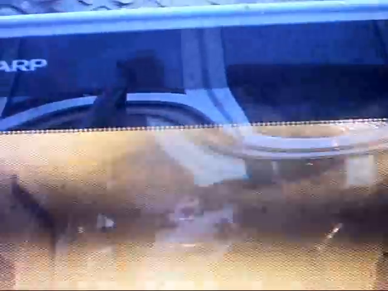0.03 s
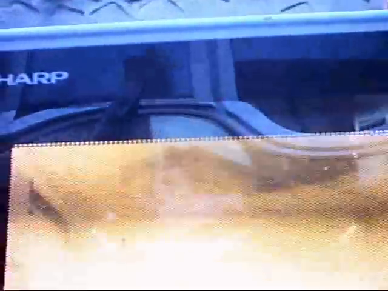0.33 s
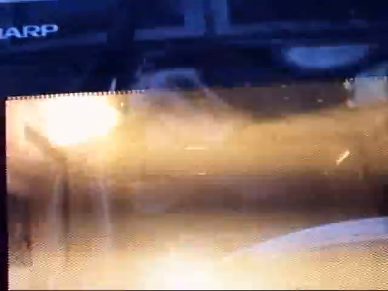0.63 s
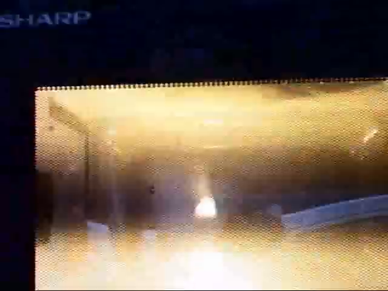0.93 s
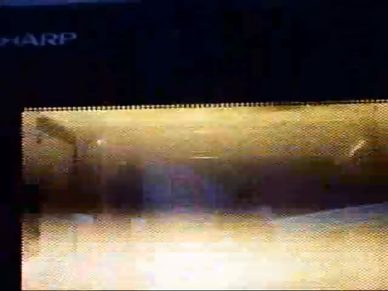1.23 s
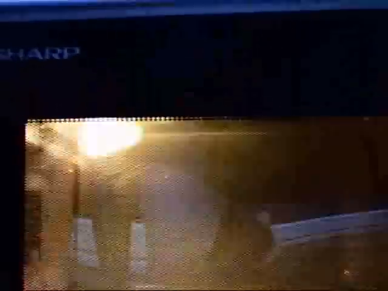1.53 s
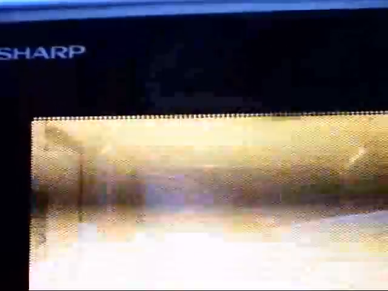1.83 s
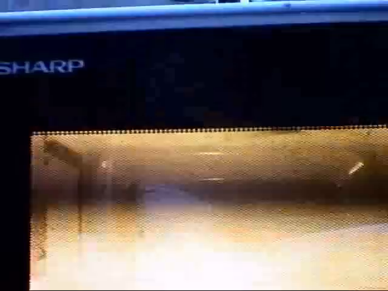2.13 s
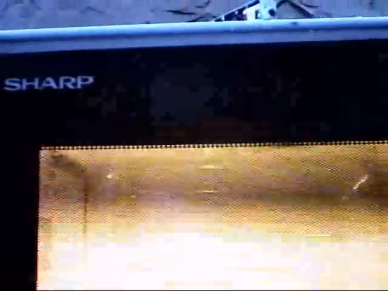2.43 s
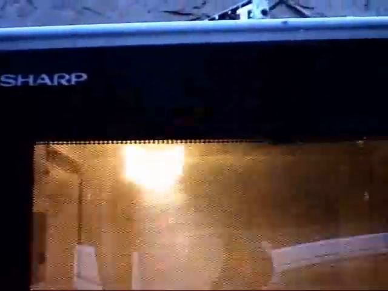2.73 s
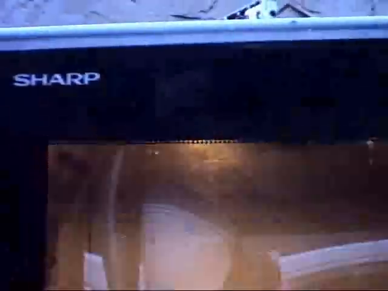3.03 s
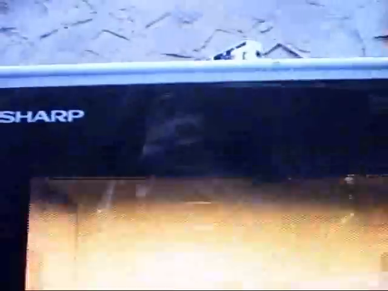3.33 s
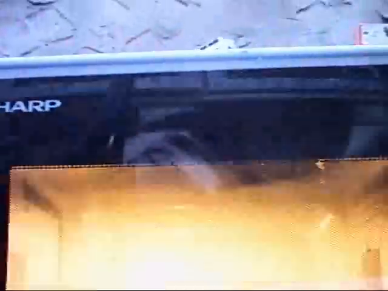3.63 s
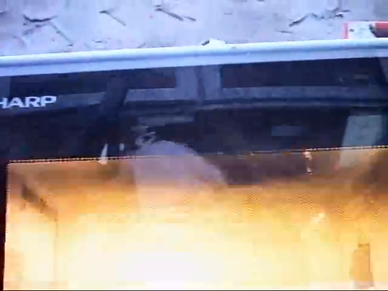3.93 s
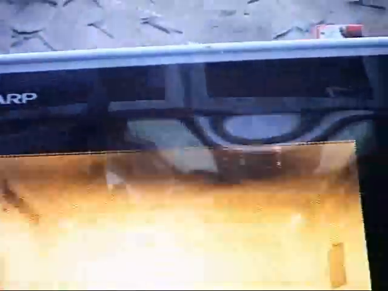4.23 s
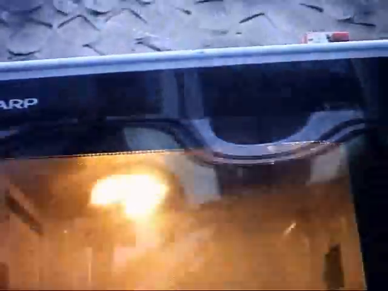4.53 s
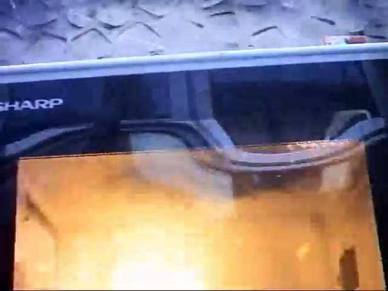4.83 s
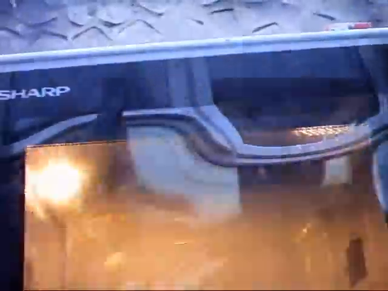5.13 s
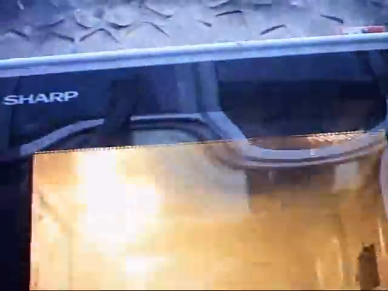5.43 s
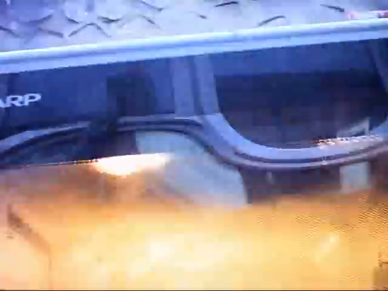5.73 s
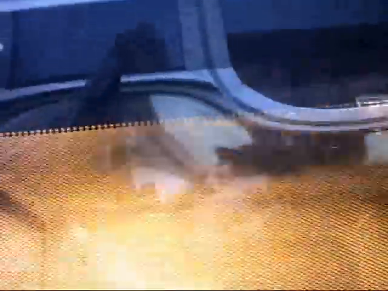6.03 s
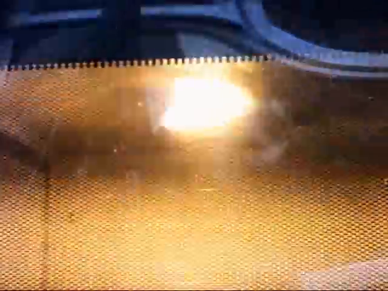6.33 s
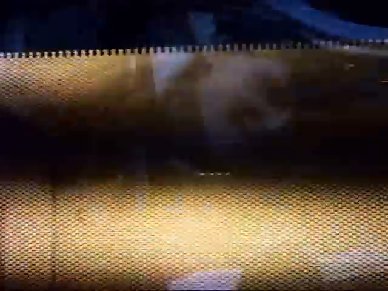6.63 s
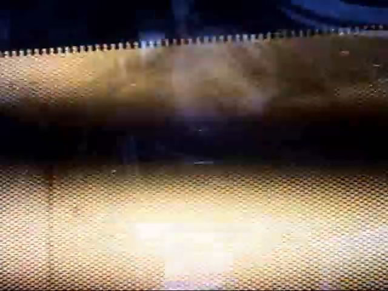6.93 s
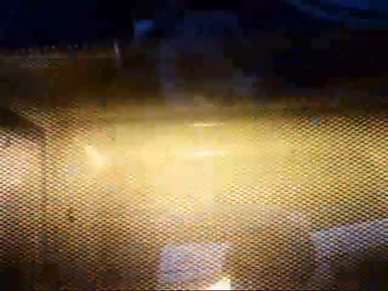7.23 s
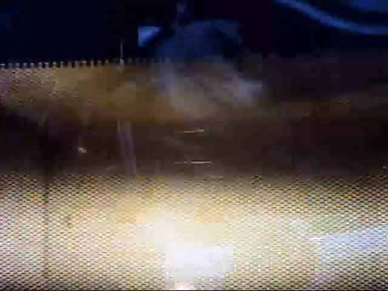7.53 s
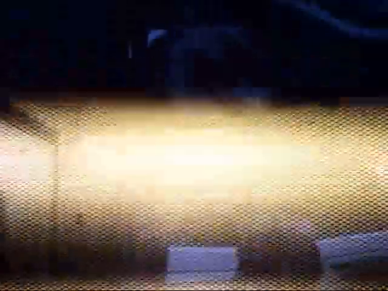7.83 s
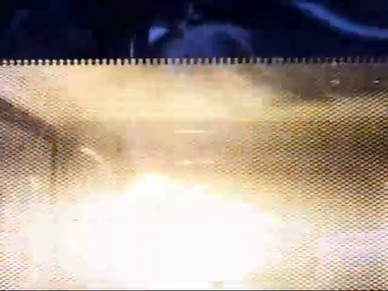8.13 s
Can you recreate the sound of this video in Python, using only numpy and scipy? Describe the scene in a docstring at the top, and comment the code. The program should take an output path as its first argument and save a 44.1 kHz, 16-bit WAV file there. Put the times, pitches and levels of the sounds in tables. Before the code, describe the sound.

Electrical arcing crackles and buzzes inside a running microwave, heard from just outside its door. The transformer hums and the fan rushes throughout, with a thin high whine above them. Spells of sizzling and sharp snaps come first, then short roaring flares with hollow booms and dull thumps. The hum and fan grow stronger as dense sizzling resumes, ending in a loud double flare. The sound is gritty and lo-fi.

```python
"""Sparks in a microwave oven

A microwave oven runs close by while something arcs inside it. The transformer hums and the fan roars;
sparks sizzle once per mains cycle, snap, and flare into plasma that rings the steel cavity.
Narrow tones swell around flares and the casing thumps. A cheap camera holds each sample at about 8 kHz,
which mirrors the hum into a thin whine and the sparks into a gritty treble."""
import sys
import numpy as np
from scipy import signal
from scipy.fft import rfft, irfft
from scipy.io import wavfile

SR = 44100
rng = np.random.default_rng(int(sys.argv[2]) if len(sys.argv) > 2 else 0)


def wav_out(sig):
    """Save sig, one row per channel (or a flat mono array), as 16-bit PCM at SR to the path in sys.argv[1]."""
    wavfile.write(sys.argv[1], SR, np.round(np.clip(np.atleast_2d(sig).T, -1, 1) * 32767).astype(np.int16))


N = 360738
TIME = np.arange(N) / SR
FILTER_HZ = np.fft.rfftfreq(8192, 1 / SR)
MAINS_HZ = 50.13

# how strongly the casing and fan carry to the moving microphone: time_s, level_db
CASING_CARRY = [(0.0, -32.5), (1.1, -34), (2.4, -33.5), (3.6, -37.5), (4.7, -41.5), (5.4, -39.5),
                (5.95, -28), (7.0, -27), (8.1, -28.5)]
# resonances of the steel cavity and door: pitch_hz, width_hz, level_db
CAVITY_MODES = [(472, 74, -7), (710, 152, -2), (1064, 95, 4.5), (1220, 114, -4), (1252, 79, 4),
                (1460, 90, -5), (1550, 68, 2), (1740, 52, -1.5), (2100, 145, -2.5), (2297, 35, 2),
                (2620, 73, 0.5), (2660, 67, -1), (2996, 280, -1), (3375, 150, 3.5), (3627, 130, 2),
                (3680, 370, 0.5)]
# plasma flares: start_s, length_s, level_db, relative_boom_db, opening_snap_db
PLASMA_FLARES = [(0.301, .04, -22.5, -7, -22), (0.381, 0.01, -23.5, -4, -20), (1.28, 0.089, -25, -7, -9),
                 (1.757, 0.026, -32.5, 0.5, -7), (2.398, .16, -22, -6, -17), (4.033, 0.052, -29, -23, -35),
                 (4.272, 0.041, -27, -6, -20), (4.432, 0.063, -29.5, -19, -9),
                 (4.73, 0.0058, -27.5, -2, -16), (4.769, 0.0076, -30.5, -11, -28),
                 (5.188, 0.032, -26, -3.5, -7.5), (5.311, 0.031, -26.5, -17, -12),
                 (5.907, 0.0071, -22, 6, -6), (6.024, 0.025, -26, -6, -10.5), (8.0, 0.014, -25, 2, -3.5),
                 (8.021, 0.013, -21, -3, -4)]


def amp(db):
    """Decibels to gain."""
    return 10 ** (np.asarray(db) / 20)


def unit(x):
    """Scales to rms 1."""
    return x / np.sqrt(np.mean(x ** 2) + 1e-20)


def curve(rows):
    """Rows of time_s, value drawn out to every sample."""
    return np.interp(TIME, *np.transpose(rows))


def swing(rows):
    """A level curve in dB about its own mean."""
    return curve(rows) - curve(rows).mean()


def spectrum(points, hz):
    """Gain of an EQ curve of frequency_hz, level_db on a log-frequency axis."""
    points_hz, db = np.transpose(points)
    return amp(np.interp(np.log(hz + 1), np.log(points_hz), db))


def resonances(modes):
    """Gain of overlapping resonances with steep skirts; losses keep each at least 4% wide."""
    power = 0
    for hz, width_hz, db in modes:
        detuning = (FILTER_HZ - hz) / (.8 * max(width_hz, hz / 25))
        power += amp(db) ** 2 / (1 + detuning ** 2) ** 2
    return np.sqrt(power)


def noise(points):
    """Noise of rms 1 through an EQ curve."""
    gain = spectrum(points, np.fft.rfftfreq(N, 1 / SR))
    return unit(irfft(rfft(rng.standard_normal(N)) * gain, N))


def drift(rate_hz):
    """A smooth random wander of rms 1."""
    hz = np.fft.rfftfreq(N, 1 / SR)
    return unit(irfft(rfft(rng.standard_normal(N)) * np.exp(-(hz / rate_hz) ** 2), N))


def add(mix, start_s, sound):
    """Mixes a sound in at its start time."""
    part = mix[max(round(start_s * SR), 0):][:len(sound)]
    part += sound[:len(part)]


def transformer(trim_db=-0.54, usual_db=-19, unrest_db=0.1):
    """Mains hum: each wavering harmonic follows the load and the casing by its own share."""
    # the load sinks while sparks last and builds before a flare: time_s, level_db
    load = [(0.0, -18.5), (0.23, -16), (0.95, -20), (1.34, -13.5), (1.55, -22.5), (1.78, -18), (2.2, -21.5),
            (2.52, -15), (2.94, -22), (3.33, -20.5), (4.18, -16), (5.75, -19.5), (5.95, -16), (6.29, -20.5),
            (6.45, -30.5), (6.58, -19), (7.81, -23), (8.02, -15.5)]
    # hum partials: mains_multiple, level_db, load_share, casing_share
    harmonics = [(1, -25.5, 1, 0), (2, -16, 0.5, 0.68), (3, -16.5, -1.1, 0.51), (4, -0.5, 1, 0.017),
                 (5, -21.5, 0.4, 0.17), (6, -58, 6.5, 0), (10, -37, 1.5, 0), (13, -34, 1.5, 0)]
    load_db = curve(load) - usual_db + unrest_db * drift(5)
    casing_db, hum = swing(CASING_CARRY), np.zeros(N)
    for multiple, db, load_share, casing_share in harmonics:
        waver_db = abs(1 - load_share) * drift(0.97)
        gain = amp(usual_db + db + load_share * load_db + casing_share * casing_db + waver_db)
        hum += gain * np.sin(2 * np.pi * (multiple * MAINS_HZ * TIME + rng.random()))
    return np.sqrt(2) * amp(trim_db) * hum


def fan(blade_hz=173.6, wander_hz=0.296, tone_db=-26, rumble_db=-27, air_db=-40):
    """A slightly wandering blade tone over the rush of air, which rumbles in the casing."""
    # blade tone partials: multiple, level_db
    blades = [(1, -1.5), (2, -33), (3, -29.5), (4, -29)]
    # casing rumble: frequency_hz, level_db
    rumble_eq = [(20, -26), (45, -17), (80, -15.5), (125, -3), (160, 1.5), (205, 2), (240, -11),
                 (290, -21.5), (450, -32), (900, -76)]
    # rush of air: frequency_hz, level_db
    air_eq = [(100, -27), (330, 2), (420, -1.5), (540, 3.5), (720, 4.5), (880, -2.5), (1200, 1),
              (1900, -5.5), (2600, -9.5), (3500, -17), (4000, -10.5)]
    casing_db = swing(CASING_CARRY)
    turns = np.cumsum(blade_hz + wander_hz * drift(1.7)) / SR
    tone = sum(amp(db) * np.sin(2 * np.pi * (k * turns + rng.random())) for k, db in blades)
    tone *= amp(tone_db + 0.62 * casing_db + drift(2.5))
    rumble = noise(rumble_eq) * amp(rumble_db + 0.46 * casing_db + drift(3))
    return np.sqrt(2) * tone + rumble + amp(air_db) * noise(air_eq)


def arc_envelope(start_s, length_s, attack_s, sag_db_per_s, release_db_per_s):
    """Gain of one arc: it strikes, sags while it burns, then dies away."""
    t, envelope = TIME[:round((length_s + .3) * SR)], np.zeros(N)
    fall_db = sag_db_per_s * t + release_db_per_s * np.maximum(t - length_s, 0)
    add(envelope, start_s, np.minimum(t / attack_s, 1) * amp(-fall_db))
    return envelope


def discharges(per_s, spread_db, cycle_db, strike, burn, back_db, glow_db):
    """Tiny discharges crowd into the part of each mains cycle where the magnetron fires."""
    turns = TIME * MAINS_HZ - strike + .025 * drift(30)  # strike and burn are fractions of a cycle
    cycle, phase = np.floor(turns).astype(int), turns % 1
    strength = amp(cycle_db * np.clip(rng.standard_normal(cycle.max() + 2), -2, 1.4))[cycle]
    back_stroke = amp(back_db) * np.exp(-((phase + .5) % 1) / burn)  # half a cycle later
    gate = strength * (np.exp(-phase / burn) + back_stroke) + amp(glow_db)
    sizes = amp(spread_db * np.clip(rng.standard_normal(N), -2, 2)) * rng.choice([-1, 1], N)
    fires = rng.random(N) < per_s / SR
    return unit(gate * sizes * fires)


def kicks():
    """One pressure kick as the magnetron fires in each mains cycle."""
    return unit(np.diff(np.floor(TIME * MAINS_HZ - .18), prepend=-1))


def oven(drive, gain, echo_db, t60_s):
    """Colours a drive and adds its reflections between the steel walls, at unit power gain."""
    log_gain = np.log(np.maximum(gain / gain.max(), 1e-3))
    mirrored = np.concatenate([log_gain, log_gain[-2:0:-1]])
    minimum_phase = np.exp(signal.hilbert(mirrored).conj())  # no ringing ahead of a hit
    colour = np.fft.ifft(minimum_phase).real[:len(FILTER_HZ)]
    t = np.arange(SR // 3) / SR
    walls = rng.standard_normal(len(t)) * amp(-60 * t / t60_s)
    walls *= amp(echo_db) / np.linalg.norm(walls)
    walls[0] = 1  # direct sound
    response = signal.fftconvolve(colour, walls)
    return signal.oaconvolve(drive, response / np.linalg.norm(response))[:N]


def sizzle(trim_db=-.5, frying_db=-43.5, door_db=-9, flicker_db=1.9):
    """Spells of sparks that buzz and kick the door at the mains rate, over faint, constant frying."""
    # spells of sparks: start_s, length_s, level_db, relative_kick_db
    spells = [(0.0, 0.16, -32, 0.5), (0.51, 0.22, -37, -0.5), (0.738, .025, -36.5, -12),
              (0.797, 0.12, -34, -1), (0.959, 0.12, -33.5, 2.5), (1.136, 0.066, -30.5, -6),
              (1.475, 0.099, -29, 2.5), (1.608, 0.092, -34.5, -6), (1.866, 0.095, -38.5, 7.5),
              (1.996, 0.096, -35, 2.5), (2.1, 0.22, -32.5, -14), (2.702, 0.098, -33, 3),
              (2.857, 0.26, -36, -0.5), (3.098, 0.4, -34, -2.5), (3.594, .07, -34.5, -7),
              (3.726, 0.16, -40.5, 6), (4.829, 0.0083, -37, -2), (4.887, 0.016, -36.5, -11),
              (4.986, .11, -39.5, 5), (5.568, 0.037, -34.5, 1), (5.679, 0.011, -29.5, -12),
              (5.766, 0.072, -32.5, 3), (6.138, 0.19, -31.5, 3), (6.326, 0.045, -32.5, -10),
              (6.386, .06, -34.5, 1.5), (6.445, .13, -31.5, -5), (6.597, 0.14, -37, -4),
              (6.802, 0.35, -36, -3), (7.142, 0.067, -34.5, -14), (7.228, 0.067, -33.5, -12),
              (7.329, .14, -36, -8), (7.478, .1, -32, 2), (7.594, .27, -31.5, -12), (7.904, 0.052, -39, -3)]
    # door modes that take the kicks: pitch_hz, width_hz, level_db
    door_modes = [(1060, 91, 1.5), (1300, 170, -5), (1600, 170, -4.5)]
    sparks = discharges(per_s=11000, spread_db=2.2, cycle_db=1.2,
                        strike=.11, burn=.31, back_db=-19, glow_db=-15)
    flicker = amp(flicker_db * drift(6.1))
    strength, force = np.zeros((2, N))
    for start_s, length_s, db, kick_db in spells:
        arc = arc_envelope(start_s, length_s, attack_s=.0043, sag_db_per_s=2.1, release_db_per_s=300)
        strength += amp(db) * arc * flicker
        force += amp(db + kick_db) * arc * flicker
    frying = amp(frying_db) * rng.standard_normal(N)
    ringing = oven(sparks * strength + frying, resonances(CAVITY_MODES), echo_db=-7, t60_s=.12)
    door = oven(kicks() * force, resonances(door_modes), echo_db=-8, t60_s=.05)
    return amp(trim_db) * ringing + amp(door_db) * door


def snaps(trim_db=-13, decay_s=.0056):
    """Large sparks, alone or striking a flare: milliseconds of breakdown, then the cavity's ring."""
    # single loud sparks: start_s, level_db
    lone_snaps = [(0.1216, -9), (0.3253, -14), (0.5217, -5.5), (0.7397, -11.5), (0.9004, -11.5),
                  (1.158, -24), (1.898, -11.5), (2.9352, -11), (2.9557, -8.5), (3.1358, -10),
                  (3.4326, -10.5), (3.6531, -8), (3.7917, -13), (5.8062, -9), (6.1853, -8.5), (6.207, -19),
                  (6.325, -2), (6.4477, -16), (6.507, -9.5), (6.7446, -11), (7.1445, -10), (7.6031, -13),
                  (7.6216, -11), (7.9004, -9.5)]
    flare_snaps = [(start_s, snap_db) for start_s, *_, snap_db in PLASMA_FLARES]
    t, drive = np.arange(SR // 50) / SR, np.zeros(N)
    for start_s, db in lone_snaps + flare_snaps:
        add(drive, start_s, amp(db) * rng.choice([-1, 1], len(t)) * np.exp(-t / decay_s))
    return amp(trim_db) * oven(drive, resonances(CAVITY_MODES), echo_db=-2, t60_s=.17)


def ringing_tones():
    """Mains-rate kicks ring a 650 Hz cavity hum swelling around flares, and a buzz near 1.2-1.3 kHz."""
    # swells of hum and buzz: start_s, length_s, level_db, pitch_hz, width_hz
    swells = [(0.19, 0.17, -39.5, 650, 25), (1.254, 0.098, -30, 650, 25), (2.334, 0.19, -35.5, 635, 25),
              (2.423, 0.2, -36, 1330, 170), (4.18, 0.2, -44, 647, 25), (4.264, 0.11, -36, 1216, 40),
              (4.614, 0.18, -41.5, 655, 25), (4.705, 0.3, -44.5, 1190, 25), (5.856, 0.19, -40, 645, 25),
              (7.913, 0.16, -36, 647, 25)]
    out = np.zeros(N)
    for start_s, length_s, db, hz, width_hz in swells:
        drive = kicks()[round(start_s * SR):][:round(length_s * SR)]
        pole = np.exp((2j * hz - width_hz) * np.pi / SR)
        ring = signal.lfilter([1], [1, -pole], drive).imag
        add(out, start_s, amp(db) * unit(ring) * signal.windows.tukey(len(ring), .5))
    return out


def flares(deep_db=-3):
    """A ball of plasma burns through the whole cycle: a denser roar, whose kicks boom in the cavity."""
    # colour of a flare: frequency_hz, level_db
    plasma_eq = [(300, -31), (550, 6), (850, 3.5), (1100, 2.5), (1350, 14.5), (1650, 2.5), (1850, 3),
                 (2050, 12.5), (2500, 10), (3000, 9.5), (3600, 13), (4000, 0)]
    # deep cavity mode: pitch_hz, width_hz, level_db
    boom_mode = [(640, 45, 0)]
    roar = discharges(per_s=12000, spread_db=2, cycle_db=.7,
                      strike=.05, burn=.4, back_db=-12, glow_db=-7)
    strength, force = np.zeros((2, N))
    for start_s, length_s, db, boom_db, _ in PLASMA_FLARES:
        arc = arc_envelope(start_s, length_s, attack_s=.0027, sag_db_per_s=51, release_db_per_s=960)
        strength += amp(db) * arc
        force += amp(db + boom_db) * arc
    push = unit(kicks() + 1.2 * roar) * force
    bright = oven(roar * strength, spectrum(plasma_eq, FILTER_HZ), echo_db=-1, t60_s=.16)
    deep = oven(push, resonances(boom_mode), echo_db=-16, t60_s=.08)
    return bright + amp(deep_db) * deep


def thumps(rise_s=0.0053):
    """The casing thumps dully: short low pushes of a few cycles."""
    # casing thumps: start_s, level_db, pitch_hz
    hits = [(4.997, -9.5, 126), (5.021, -18, 70), (5.189, -10.5, 170), (5.91, -7.5, 158),
            (8.021, -8.5, 164)]
    t, out = np.arange(SR // 10) / SR, np.zeros(N)
    envelope = t / rise_s * np.exp(1 - t / rise_s)
    for start_s, db, hz in hits:
        add(out, start_s, -amp(db) * envelope * np.sin(2 * np.pi * hz * t))
    return out


def scene():
    """The oven, heard from just outside its door."""
    return (transformer() + fan() + sizzle() + flares() + ringing_tones() + snaps() + thumps())[None]


def record(dry):
    """The camera holds each sample until the next, mirroring the sound round multiples of its rate."""
    hold_hz, cutoff_hz, fade_s = 8010, 15760, .006
    fades = np.minimum(np.minimum(TIME, TIME[::-1]) / fade_s, 1)
    narrow = irfft(rfft(dry[0] * fades) * (np.fft.rfftfreq(N, 1 / SR) < hold_hz / 2), N)
    # the sampling clock lags and catches up unevenly 30 times a second, which frays the whine
    frame = TIME * 30 + .08 * drift(12)
    lag = (.27 + .08 * drift(12)) * (frame % 1 - .5)
    clock = hold_hz * TIME - lag + .03 * drift(500)
    ticks_s = np.interp(np.arange(int(clock[-1])), clock, TIME)
    # the staircase is the slope of its running area, read on a twice finer grid
    area = np.cumsum(np.interp(ticks_s, TIME, narrow) * np.diff(ticks_s, prepend=0))
    fine_s = np.arange(2 * N + 1) / (2 * SR)
    stairs = np.diff(np.interp(fine_s, ticks_s, area)) * 2 * SR
    lowpass = signal.firwin(2047, cutoff_hz, window=("kaiser", 9), fs=2 * SR)
    return signal.oaconvolve(stairs, lowpass, "same")[None, ::2]


dry = scene()
out = record(dry)
wav_out(out)
```